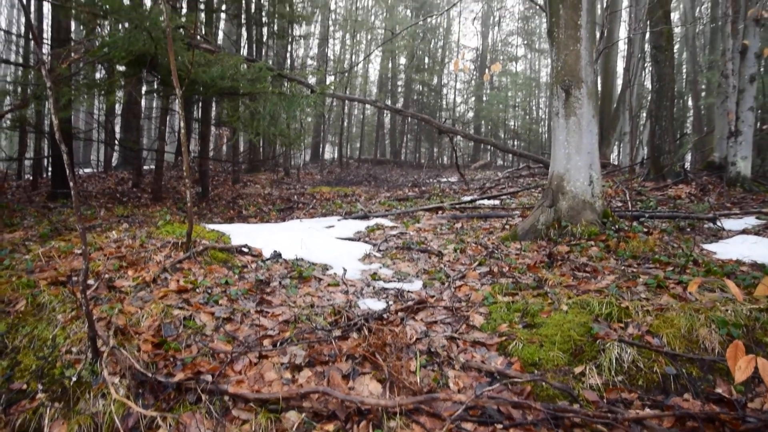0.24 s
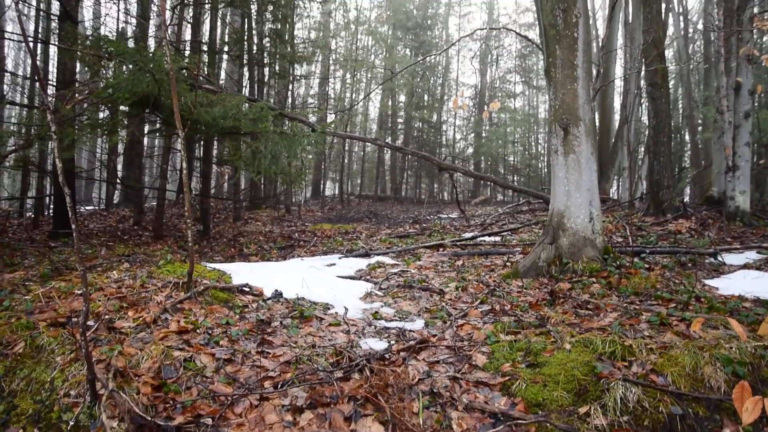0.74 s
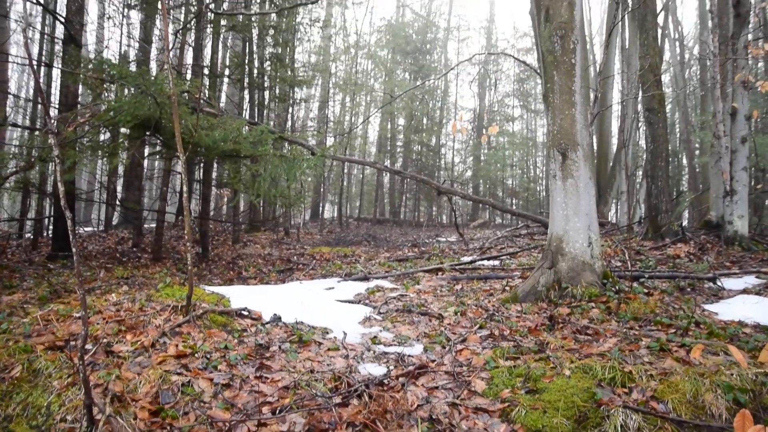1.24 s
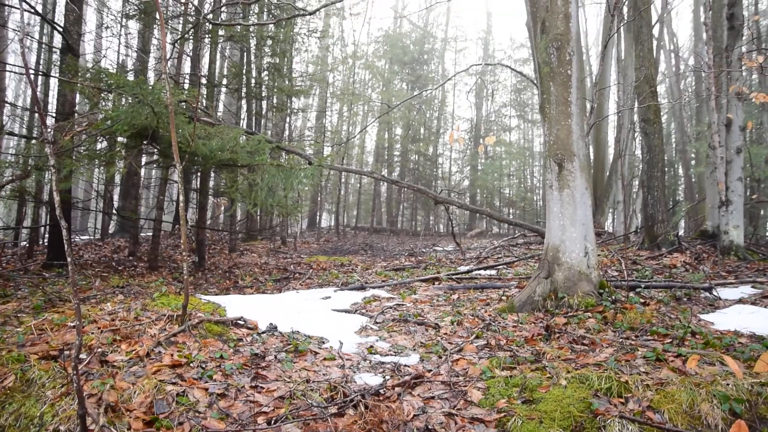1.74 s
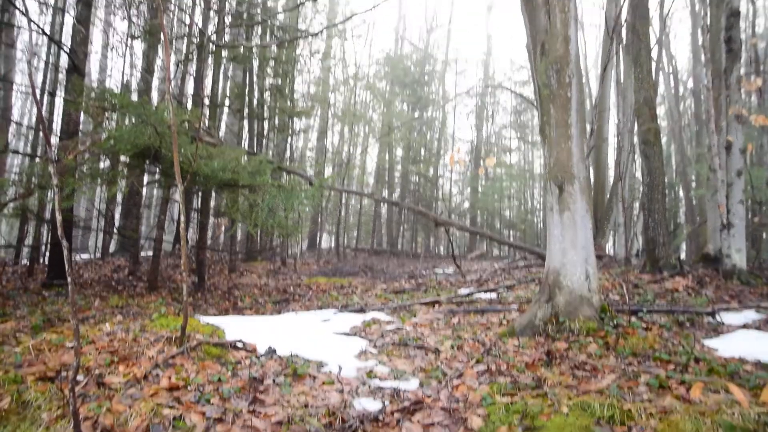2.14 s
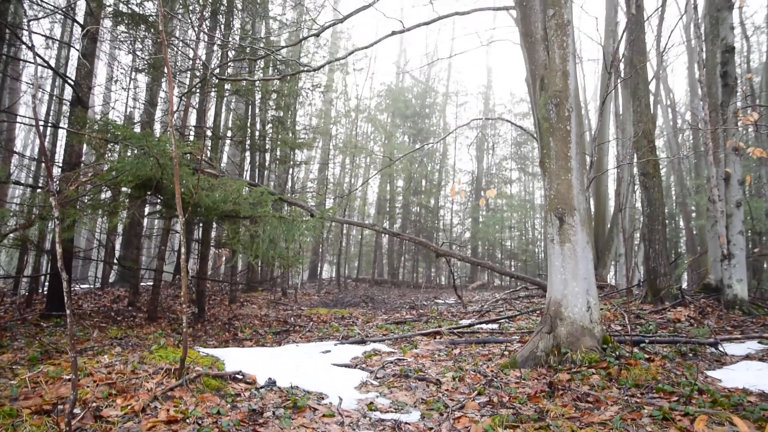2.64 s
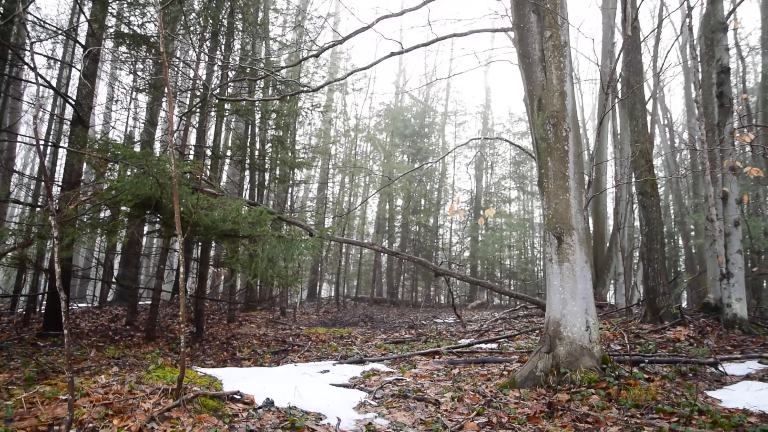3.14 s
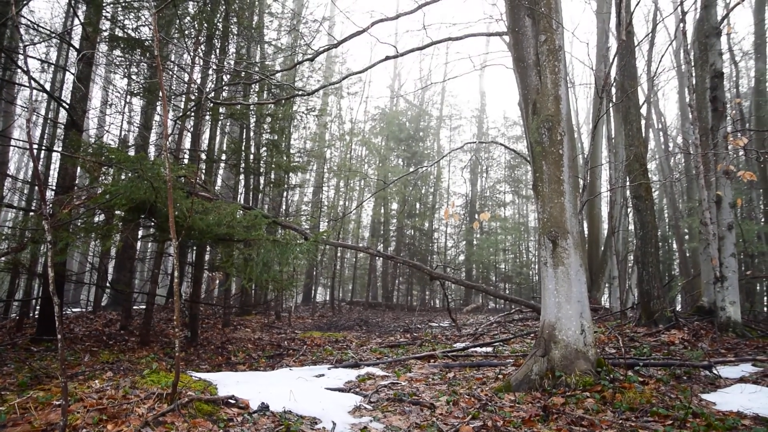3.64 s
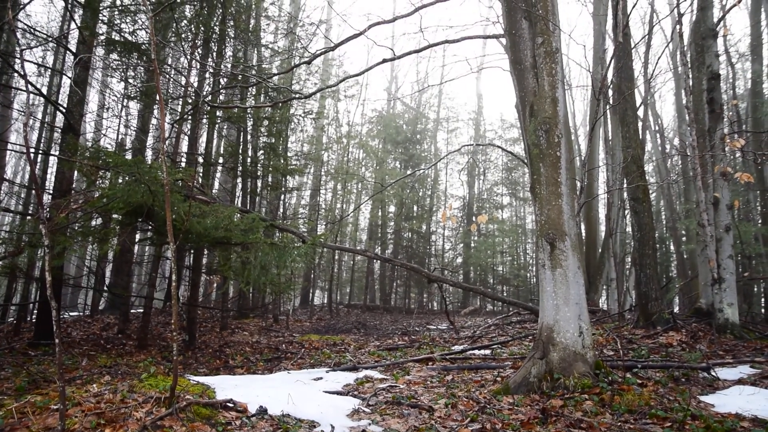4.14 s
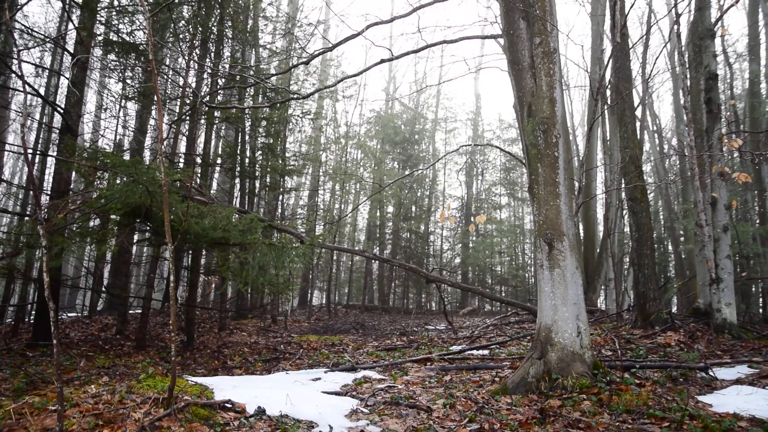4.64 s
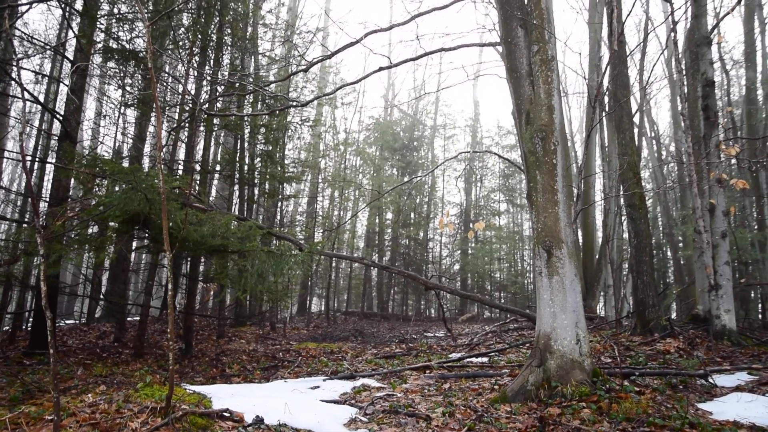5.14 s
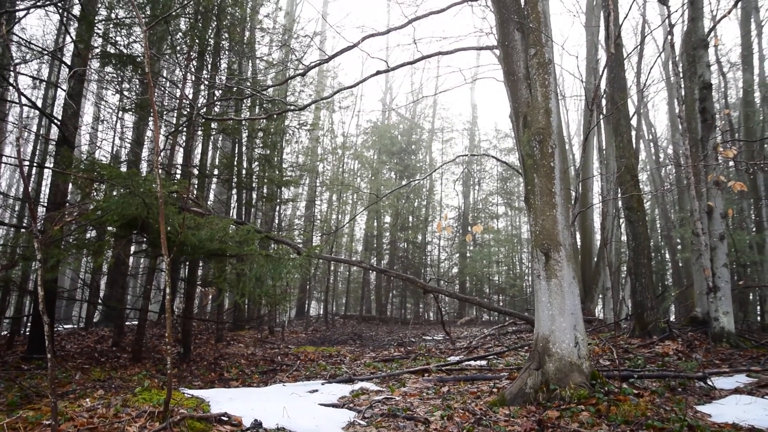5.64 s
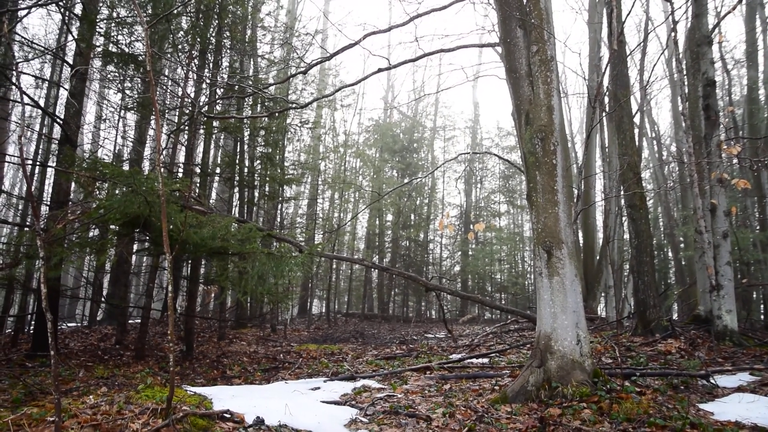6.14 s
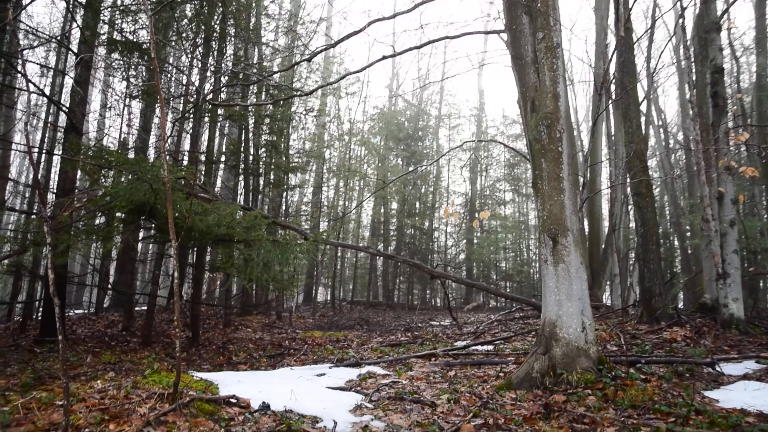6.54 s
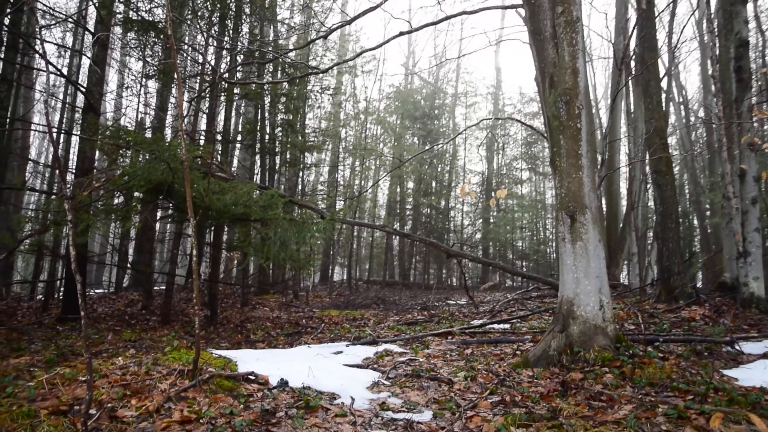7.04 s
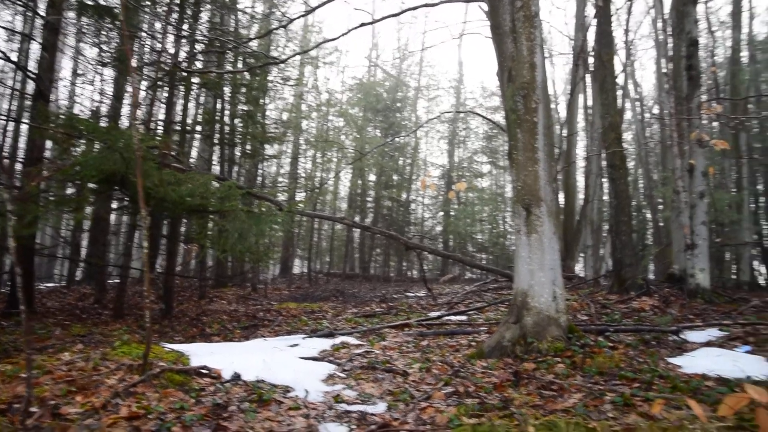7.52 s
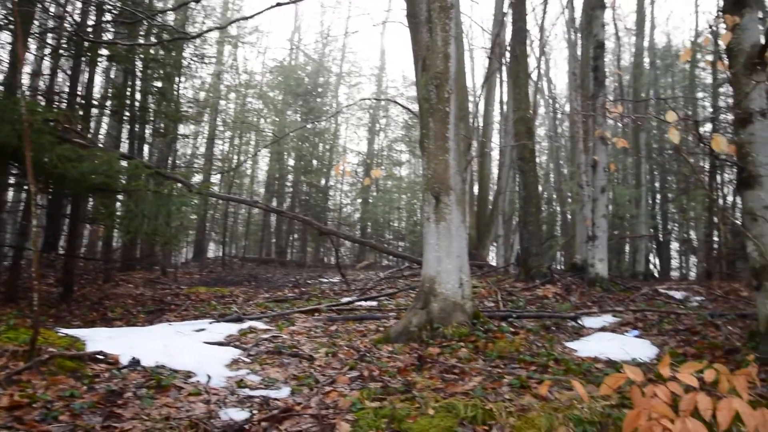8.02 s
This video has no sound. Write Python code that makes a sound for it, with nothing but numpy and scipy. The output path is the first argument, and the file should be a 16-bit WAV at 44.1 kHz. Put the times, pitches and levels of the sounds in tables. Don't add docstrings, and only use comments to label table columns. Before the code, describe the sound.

In a quiet, damp wood, faint songbird whistles come first, then two distant hoarse crow caws. A woodpecker hammers one rapid roll on a hollow limb, quickening as it weakens, its echo lingering among the trunks. A few drops tick on leaves and short chirps return. The hand-held camera microphone adds steady motor hiss, dull handling scuffs, and near the end a sharp plastic snap and rubbing.

```python
import sys
import numpy as np
from scipy import signal
from scipy.fft import rfft, irfft, next_fast_len
from scipy.io import wavfile
from scipy.ndimage import map_coordinates

SR = 44100
rng = np.random.default_rng(int(sys.argv[2]) if len(sys.argv) > 2 else 0)


def makeup_ratio(level_db):
    decades = np.asarray(level_db, float) / 20
    return 10 ** decades


def output_pcm(signal):
    pcm = np.clip(np.atleast_2d(signal).T, -1, 1) * 32767
    wavfile.write(sys.argv[1], SR, np.round(pcm).astype(np.int16))


N = 365148


def woodpecker():
    # [f/Hz, level/dB, t60/s, sign of first motion]
    limb = [(300, -33, .06, 1), (420, -17.8, .086, -1), (524, -1.5, .056, 1), (682, -7.4, .038, -1),
            (794, -12.2, .03, -1), (887, -13.1, .041, -1), (1070, -14, .017, -1), (1259, -14.5, .023, 1),
            (1343, -15.5, .05, 1), (1596, -9.5, .034, -1), (1817, -17.1, .021, 1), (2200, -21.8, .019, 1)]
    # [f/Hz, width/Hz, level/dB]
    bark = [(2520, 100, -16.5), (2940, 400, -8.5), (3700, 400, -23.5), (4530, 650, -32), (5110, 400, -25),
            (6400, 600, -29.5)]
    # [delay/s, level/dB, sign]
    neighbours = [(.0085, -16.8, 1), (.0108, -17, 1), (.0116, -23, -1), (.0145, -24, -1), (.0154, -16, 1),
                  (.0287, -17.6, -1), (.0407, -22, -1), (.0541, -22, 1)]
    t = np.arange(SR // 5) / SR
    ring = sum(sign * makeup_ratio(db - 60 * t / t60) * np.sin(2 * np.pi * hz * t) for hz, db, t60, sign in limb)
    push, crack = np.zeros((2, N))
    u = np.arange(-50, 50)
    for s, db in blows():
        contact_samples = .000065 * SR * makeup_ratio(-.8 * (db + 6))
        blow = np.exp(-.5 * (u / contact_samples) ** 2)
        push[round(s * SR) - 20:][:100] += makeup_ratio(db) * blow / blow.sum()
        crack[round(s * SR) + 70] = makeup_ratio(2.18 * db + 21)
    knock = signal.fftconvolve(push, ring)[:N] + filtered(crack, resonances(bark, order=2))
    knock = signal.sosfilt(signal.butter(6, 285, "high", fs=SR, output="sos"), knock)
    echoes = sum(sign * makeup_ratio(db) * np.roll(knock, round(delay * SR)) for delay, db, sign in neighbours)
    return knock, echoes


def blows():
    # [blow number, wait/ms]
    pace = [(0, 96.4), (1, 91.3), (5, 81.7), (10, 76), (15, 72.8), (16, 68.7), (20, 65.3)]
    # [t/s, peak level/dB]
    effort = [
        (3.3, -7.5),
        (3.39, -6),
        (3.95, -6.5),
        (4.55, -9.5),
        (4.86, -14),
        (4.93, -16.5),
    ]
    start_s, count = 3.2997, 22
    waits_ms = np.interp(np.arange(count - 1), *np.transpose(pace))
    s = start_s + np.cumsum(np.r_[0, waits_ms]) / 1000
    return zip(s, np.interp(s, *np.transpose(effort)))


def trunks(x, near_db, far_db):
    # [f/Hz, t60/s]
    near = [(400, 0.33), (1500, 0.24), (5000, 0.15)]
    # [f/Hz, t60/s]
    far = [(430, 0.37), (530, 3.08), (750, 2.2), (1200, 2.52), (3000, 0.51), (8000, 0.74)]
    echo = makeup_ratio(near_db) * tail(near) + makeup_ratio(far_db) * tail(far)
    return signal.fftconvolve(np.pad(x, (800, 0))[None], echo, axes=1)[:, :N]


def tail(decays):
    hz, t, z = signal.stft(rng.standard_normal((2, 2 * SR)), SR, nperseg=256)
    echo = signal.istft(z * makeup_ratio(-60 * t / along(decays, hz)[:, None]), SR, nperseg=256)[1]
    echo = diffuse(echo, [(500, 1.0), (1500, 0.99), (4000, .4)])
    return echo / np.linalg.norm(echo[0])


def crow():
    # [t/s, length/s, top pitch/Hz, scoop up to it/Hz, level/dB]
    caws = [
        (1.752, .55, 616.3, 139.8, -48.5),
        (2.526, .5, 598.3, 40, -48.5),
    ]
    # [f/Hz, width/Hz, level/dB]
    throat = [(1240, 440, 0), (1780, 560, 6.5)]
    voice = np.zeros(N)
    for row in caws:
        hz, db, sounding = caw(*row)
        turns = np.cumsum(hz * (1 + 0.02774 * wobble(90))) / SR
        gate = (.5 + .5 * np.cos(2 * np.pi * turns)) ** 6
        source = unit(gate - gate.mean()) + 0.71 * unit(gate * rng.standard_normal(N))
        throaty = unit(filtered(source, resonances(throat, order=2)))
        voice += sounding * makeup_ratio(db - 3 + 2.2 * wobble(40)) * throaty
    return voice


def caw(s, length, top_hz, scoop_hz, db):
    scoop_s, attack_s, release_s = .02, .04, .1
    sag_s, bend_s, sag_hz_per_s, tire_db_per_s = .3, 0.024, 560, 8.5
    t = np.arange(N) / SR - s
    tiring = bend_s * np.logaddexp(0, (np.clip(t, 0, length) - length + sag_s) / bend_s)
    hz = top_hz - scoop_hz * np.exp(-np.maximum(t, 0) / scoop_s) - sag_hz_per_s * tiring
    sounding = np.clip(np.minimum(t / attack_s, (length - t) / release_s), 0, 1)
    return hz, db - tire_db_per_s * tiring, sounding


def songbird():
    # [t/s, length/s, first f/Hz, last f/Hz, level/dB]
    chirps = [(0.025, 0.13, 2180, 2330, -53), (.2, 0.042, 2240, 2240, -52), (.42, .02, 3350, 3510, -53),
              (0.662, 0.048, 3350, 3450, -59), (0.697, 0.049, 3120, 2650, -45),
              (0.881, 0.065, 2420, 2300, -51.5), (.93, 0.047, 2250, 2130, -51),
              (1.048, 0.041, 2305, 2410, -48.5), (5.58, 0.022, 2820, 2450, -48),
              (5.785, 0.043, 2650, 2490, -48), (6.281, 0.018, 2650, 2560, -48),
              (6.307, 0.085, 2320, 2190, -48), (6.452, 0.022, 2890, 2480, -49),
              (6.48, .05, 2410, 2100, -48)]
    song, waver = np.zeros(N), 1 + 0.01 * wobble(120)
    for s, length, first_hz, last_hz, db in chirps:
        k, n = round(s * SR), int(length * SR)
        hz = np.linspace(first_hz, last_hz, n) * waver[k:][:n]
        whistle = np.sin(2 * np.pi * np.cumsum(hz) / SR)
        song[k:][:n] += makeup_ratio(db) * np.hanning(n) ** 0.21 * whistle
    return song * makeup_ratio(0.87 * wobble(70))


def drops():
    # [t/s, peak/dB, low thud/dB, spatter/dB]
    falls = [
        (1.7594, -42, -17.5, -16),
        (3.5468, -33, -21, -18),
        (4.144, -41, -7.5, -20),
        (5.022, -33.5, -11.5, -10),
        (6.2527, -74.5, 16.5, -20),
        (6.848, -29, -17.5, -22),
    ]
    tick, thud, spatter = np.zeros((3, N))
    for s, db, thud_db, spatter_db in falls:
        k = round(s * SR)
        tick[k:][:400] += makeup_ratio(db) * burst(.006, size=400)
        thud[k:][:400] += makeup_ratio(db + thud_db + 21) * burst(0.023, size=400)
        spatter[k + 200:][:6000] += makeup_ratio(db + spatter_db) * burst(.2, size=6000)
    bright = filtered(tick, resonances([(4830, 4000, 0), (9300, 5000, 0.97)], order=3))
    fine = filtered(spatter, resonances([(6400, 7000, 0)], order=3))
    return bright + fine + filtered(thud, resonances([(895, 2700, 0)], order=2))


def shell(hz):
    # [f/Hz, width/Hz, level/dB]
    left = [(1260, 270, -6), (2140, 550, -6), (2736, 190, -1.5), (2954, 450, 2), (3499, 200, 3),
            (3726, 220, -0.5), (4002, 91, -4.5), (4470, 170, 1), (6864, 530, -5.5), (7194, 280, -2),
            (7600, 250, -11.5), (8370, 1200, -17), (8700, 400, -20), (11270, 300, -26)]
    # [f/Hz, width/Hz, level/dB]
    right = [(1226, 180, 1.5), (2218, 200, -1), (2650, 210, 5), (2915, 66, -1), (3210, 220, -3.5),
             (3710, 270, -21), (4403, 200, -4), (4612, 150, -6), (5320, 790, -9.5), (6150, 350, -18),
             (6850, 270, -22), (7210, 280, -10), (7800, 1900, -20.5), (11100, 400, -30.5)]
    return np.array([resonances(left, order=2)(hz), resonances(right, order=2)(hz)])


def motor():
    # [t/s, hiss level/dB]
    load = [(0.0, -49), (0.53, -51), (3.5, -50.5), (5.9, -52), (6.46, -49.5), (7.19, -51.5), (8.05, -50.5),
            (8.28, -46.5)]
    flutter = makeup_ratio(0.4 * wobble(4.0) + 0.42 * wobble(30) + 2.32 * wobble(160))
    noise = diffuse(rng.standard_normal((2, N)), [(1000, 0.8), (3000, 0.8), (7000, 0.4)])
    return makeup_ratio(curves(load)[0]) * unit(filtered(flutter * noise, shell))


def handling():
    hand = touch()
    through_air = makeup_ratio(-22.5) * filtered(hand, resonances([(9900, 4000, 0.0073)], order=2))
    return filtered(hand * makeup_ratio([[-6], [4]]), shell) + through_air


def touch():
    # [t/s, peak/dB]
    scuffs = [(0.1494, -42), (0.314, -43), (0.4254, -37), (0.478, -38), (1.276, -40), (1.4646, -34.5),
              (1.5569, -52), (2.0689, -43), (6.9133, -33), (7.385, -33), (7.4158, -32.5), (7.495, -35.5),
              (7.5444, -50), (7.6144, -44), (7.676, -40), (8.2694, -35.5)]
    edge_db = -2
    rub_start_s, rub_rise_s, rub_db = 8.085, 0.081, -43
    dull, edge = np.zeros((2, N))
    stroke = np.hanning(700)
    for s, db in scuffs:
        k = round(s * SR) - 150
        dull[k:][:700] += (makeup_ratio(db) * stroke * rng.standard_normal(700))[:N - k]
        edge[k:][:700] += (makeup_ratio(db + edge_db) * stroke * rng.standard_normal(700))[:N - k]
    rise = np.clip((np.arange(N) / SR - rub_start_s) / rub_rise_s, 0, 1) ** 2
    rub = rise * makeup_ratio(rub_db + 1.9 * wobble(250)) * rng.standard_normal(N)
    knock = filtered(dull, resonances([(2730, 2100, 3.0)], order=2))
    scrape = filtered(edge, resonances([(5600, 2300, 5.8)], order=2))
    rustle = resonances([(3280, 2200, 11.7), (5670, 2200, 12.0), (9700, 2000, 10.5)], order=2)
    return knock + scrape + filtered(rub, rustle)


def snap():
    # [t/s, peak/dB]
    impacts = [
        (8.0539, -13),
        (8.057, -30.5),
        (8.0587, -35),
        (8.0767, -32),
        (8.082, -43),
    ]
    hits = np.zeros(N)
    for s, db in impacts:
        hits[round(s * SR)] = makeup_ratio(db + 31.5)
    plastic = [(2650, 740, -1.5), (3460, 700, -11), (5140, 1800, -12), (7000, 1400, -22), (9900, 1600, -39)]
    ring = filtered(hits, resonances(plastic, order=3))
    return np.array([ring, np.roll(ring, 4)]) * makeup_ratio([[0], [1.5]])


def air():
    # [f/Hz, density/dB per Hz]
    spectrum = [(20, -23.5), (50, -18), (95, -14), (120, -6.5), (150, -10), (400, -4), (900, -1.5),
                (1800, -6), (3000, -3.5), (5000, -16.5), (9000, -18.5), (13700, -34.5), (14500, -34.5),
                (16000, -55)]
    # [f/Hz, likeness/0-1]
    alike = [(60, .8), (300, .7), (1400, .55), (3000, 0.4), (8000, .3)]
    hush = filtered(rng.standard_normal((2, N)), lambda hz: makeup_ratio(along(spectrum, hz)))
    return makeup_ratio(-56 + 0.43 * wobble(0.81)) * unit(diffuse(hush, alike)) * makeup_ratio([[.5], [-.5]])


def whine():
    whine_hz = 15674.65
    tone = np.sin(2 * np.pi * whine_hz * np.arange(N) / SR + .06 * wobble(40))
    sides = np.array([-makeup_ratio(-69 + wobble(1)), makeup_ratio(-58.5 + .4 * wobble(.5))])
    return sides * tone * makeup_ratio(.8 * wobble(20) + 1.3 * wobble(80))


def unit(x):
    return x / np.sqrt(np.mean(x ** 2) + 1e-20)


def along(points, hz):
    f, v = np.transpose(points)
    return np.interp(np.log(hz + 1), np.log(f + 1), v)


def curves(rows):
    s, *cols = np.transpose(rows)
    return [np.interp(np.arange(N) / SR, s, c) for c in cols]


def wobble(rate):
    knots = rng.standard_normal(int(N * rate / SR) + 4)
    return map_coordinates(knots, [np.arange(N) * rate / SR])


def burst(t60, size):
    return rng.standard_normal(size) * makeup_ratio(-60 * np.arange(size) / SR / t60)


def filtered(x, response):
    m = next_fast_len(x.shape[-1] + SR // 2)
    return irfft(rfft(x, m) * response(np.fft.rfftfreq(m, 1 / SR)), m)[..., :x.shape[-1]]


def resonances(modes, order=1):
    def response(f):
        total = 0
        for k, (c, w, db) in enumerate(modes):
            total = total + (-1) ** k * makeup_ratio(db) * (1j * f * w / (c * c - f * f + 1j * f * w)) ** order
        return total
    return response


def diffuse(pair, alike):
    def mid_side(hz):
        turn = np.arccos(np.clip(along(alike, hz), -1, 1)) / 2
        return np.array([np.cos(turn), np.sin(turn)])
    mid, side = filtered(pair, mid_side)
    return np.array([mid + side, mid - side])


def scene():
    # [f/Hz, level/dB]
    returned = [(300, 6.5), (520, -2), (700, -1.5), (915, -6), (1000, 9), (1300, -3), (1600, -11),
                (2000, 8), (2500, 6), (4000, -9)]
    drum, echoes = woodpecker()
    coloured = filtered(drum, lambda hz: makeup_ratio(along(returned, hz)))
    roll = drum + makeup_ratio(0.5) * echoes + trunks(coloured, near_db=-12.5, far_db=-14)
    caws, song = crow(), songbird()
    calls = 0.56 * caws + song + trunks(caws + 0.85 * song, near_db=-17.0, far_db=-3.0)
    wood = makeup_ratio([[.6], [-.6]]) * (roll + calls) + drops()
    return wood + motor() + handling() + snap() + air() + whine()


def roll_off(x):
    return signal.sosfilt(signal.butter(12, 16050, fs=SR, output="sos"), x)


def record(dry):
    return roll_off(dry)


dry = scene()
out = record(dry)
output_pcm(out)
```